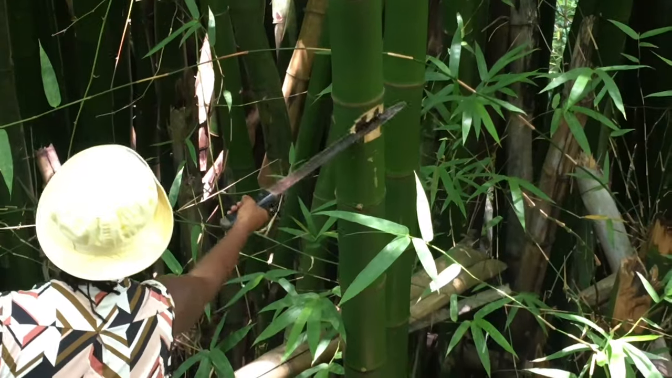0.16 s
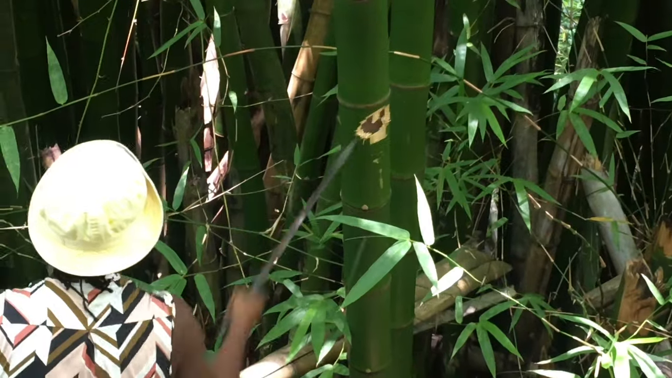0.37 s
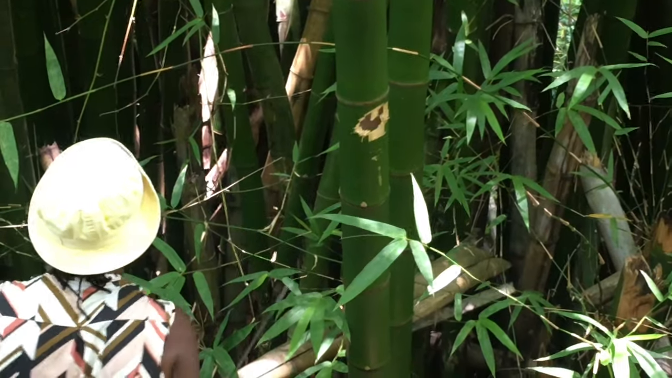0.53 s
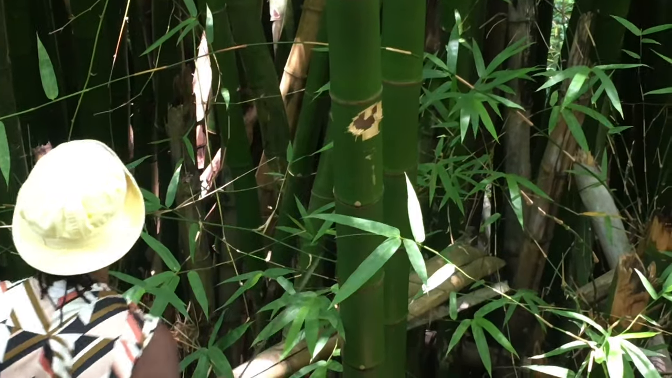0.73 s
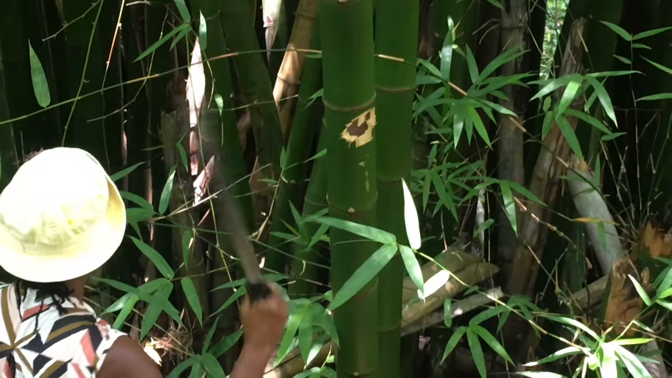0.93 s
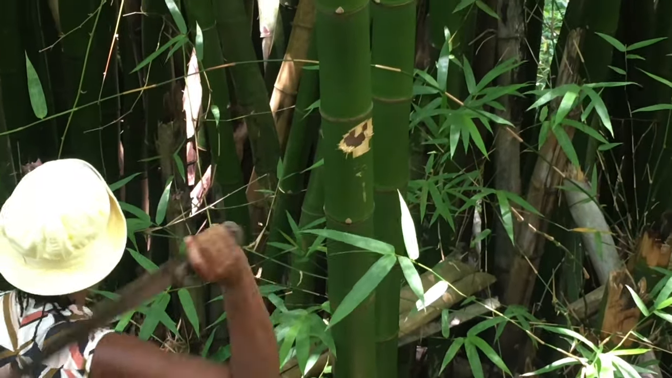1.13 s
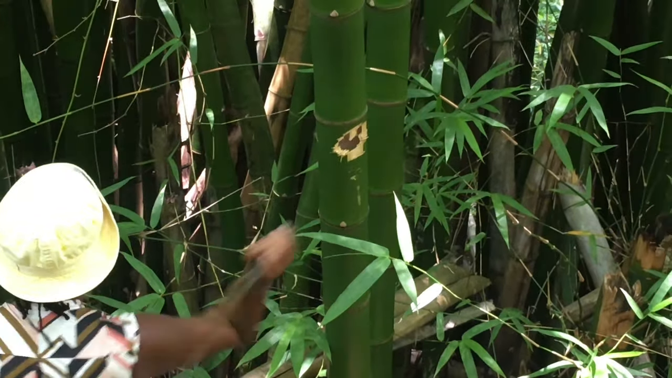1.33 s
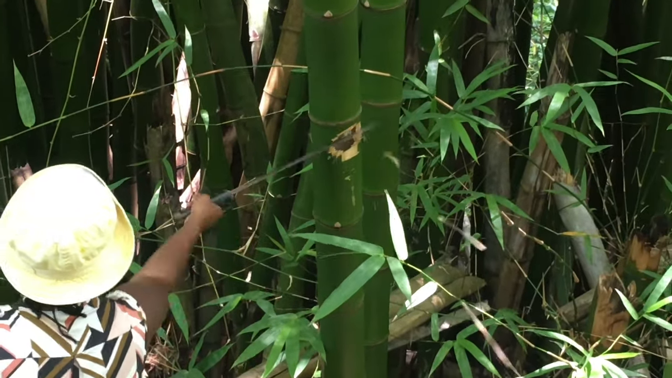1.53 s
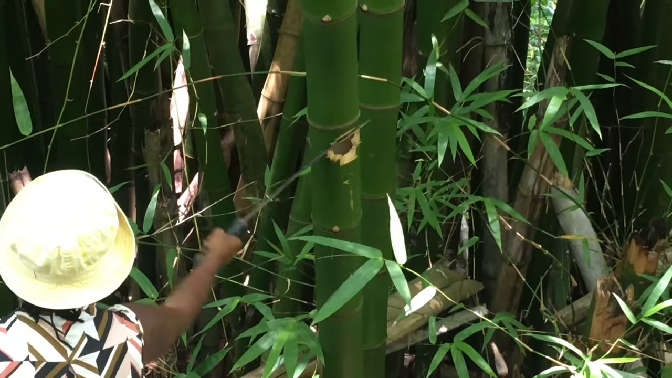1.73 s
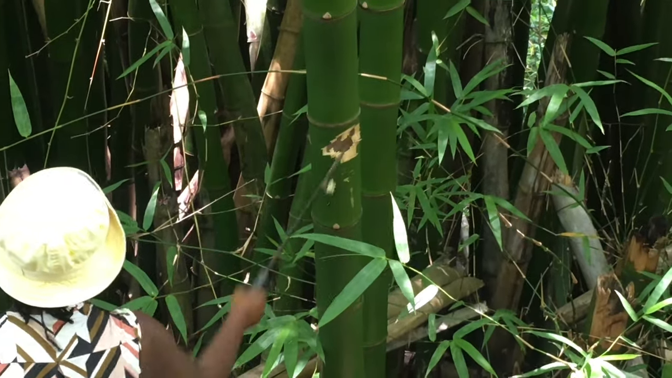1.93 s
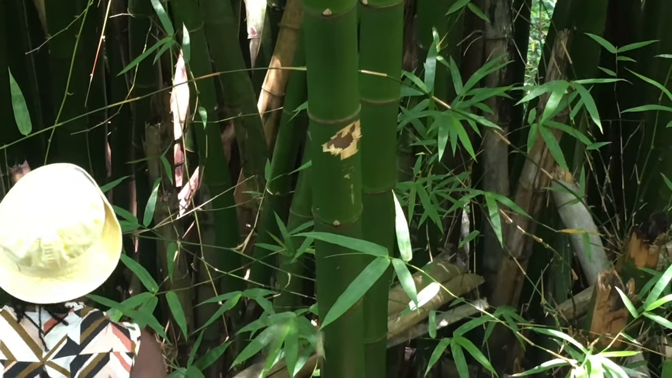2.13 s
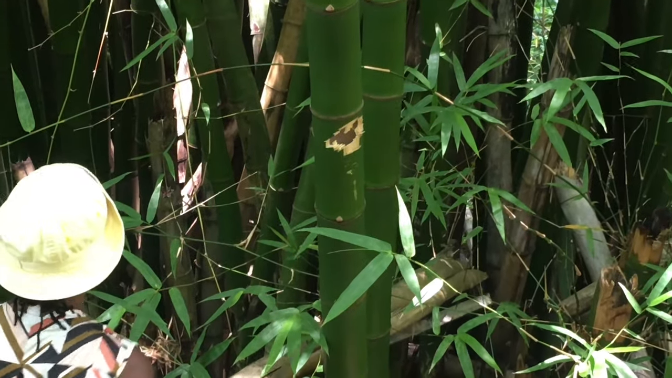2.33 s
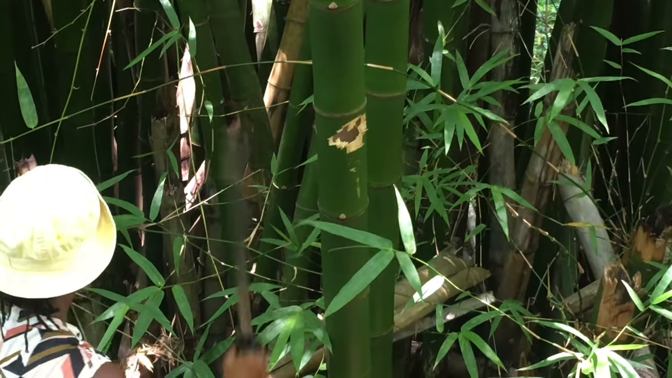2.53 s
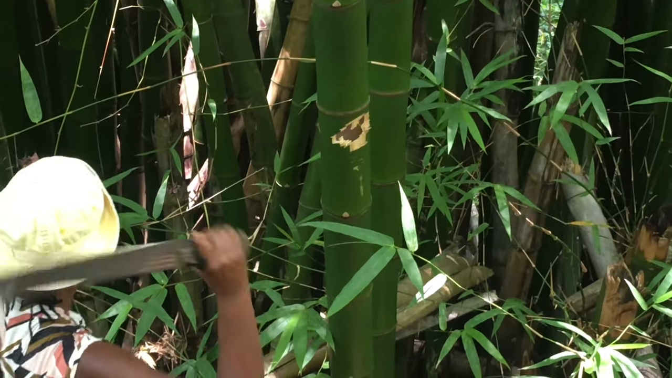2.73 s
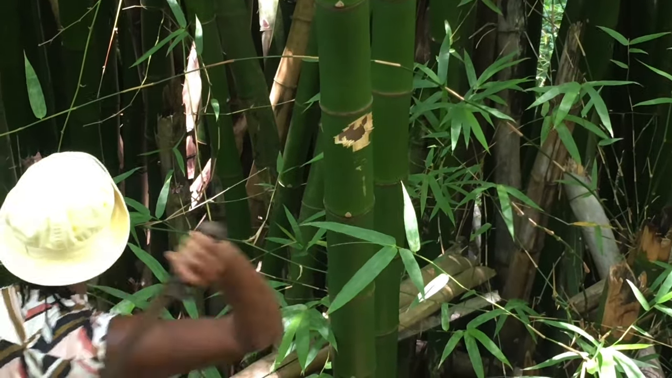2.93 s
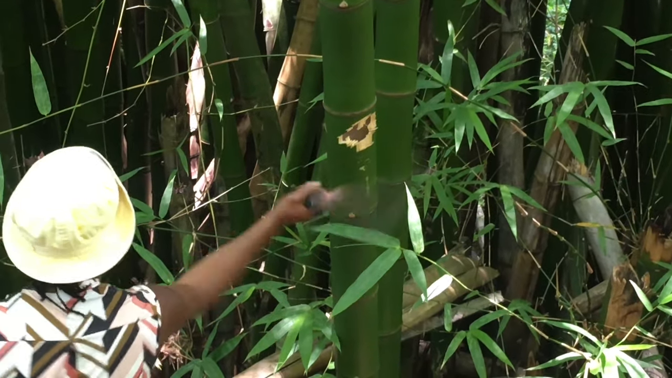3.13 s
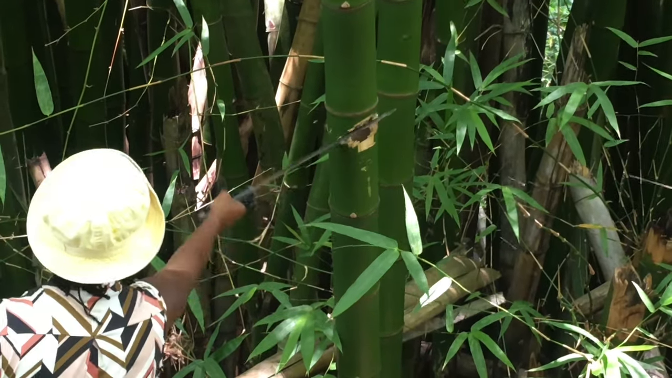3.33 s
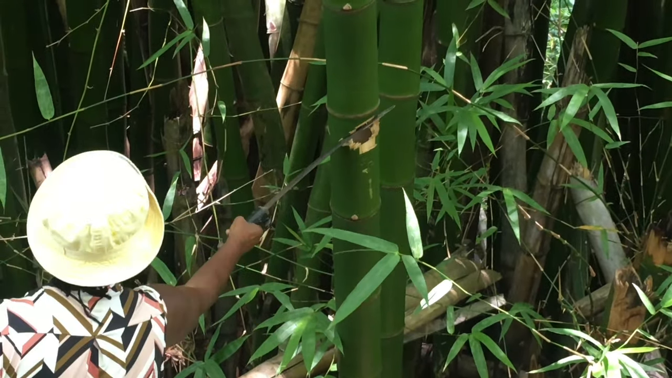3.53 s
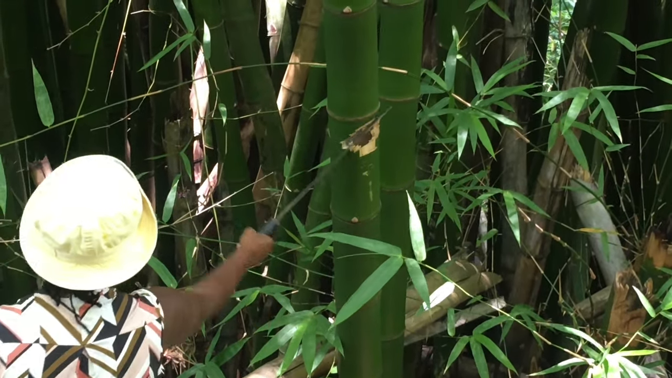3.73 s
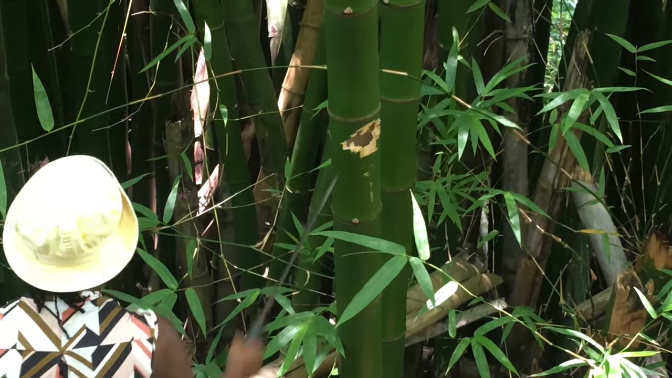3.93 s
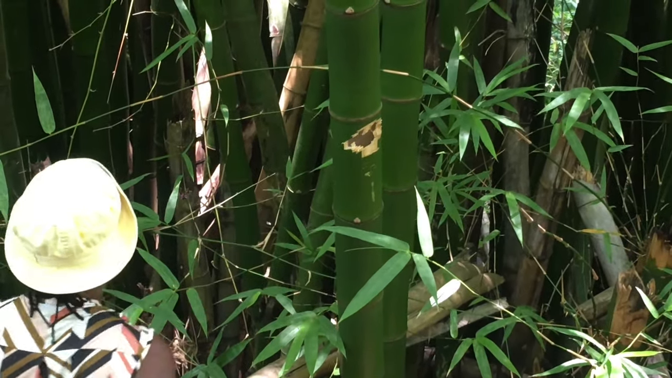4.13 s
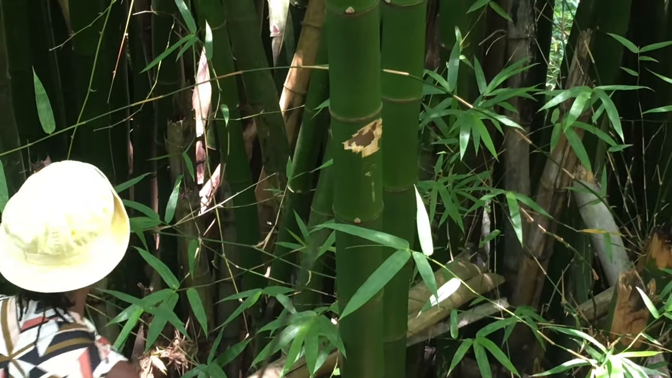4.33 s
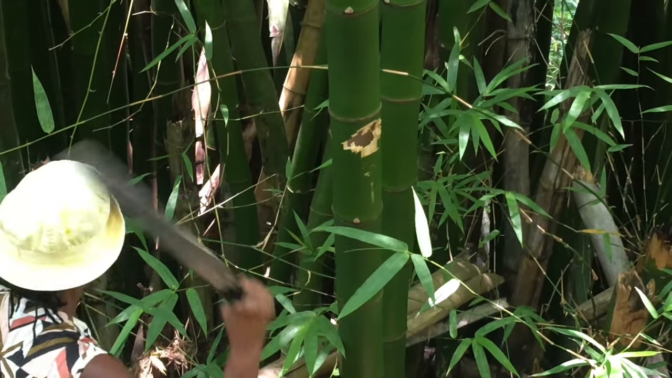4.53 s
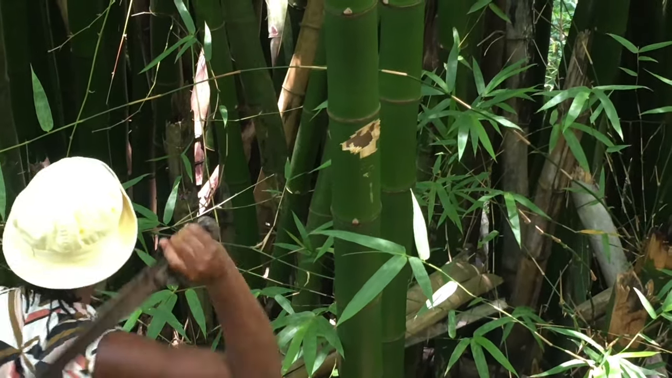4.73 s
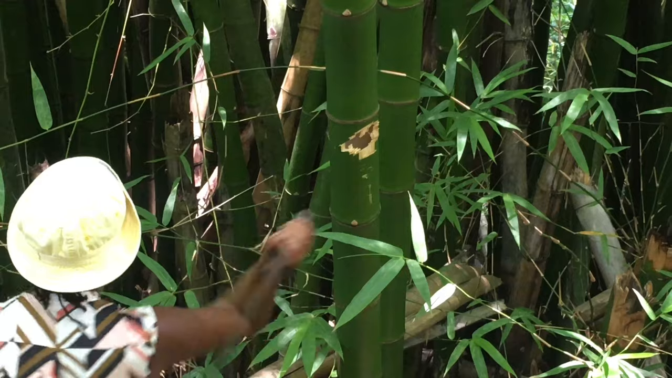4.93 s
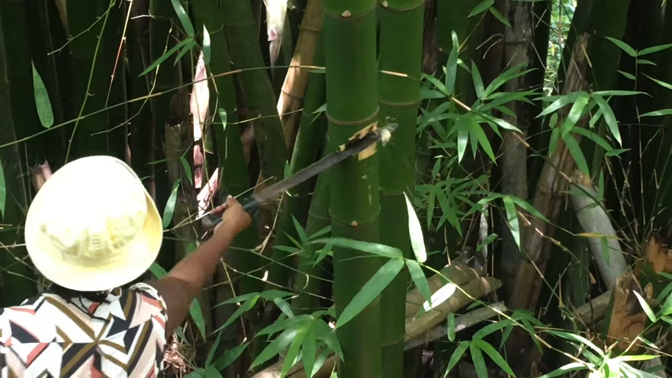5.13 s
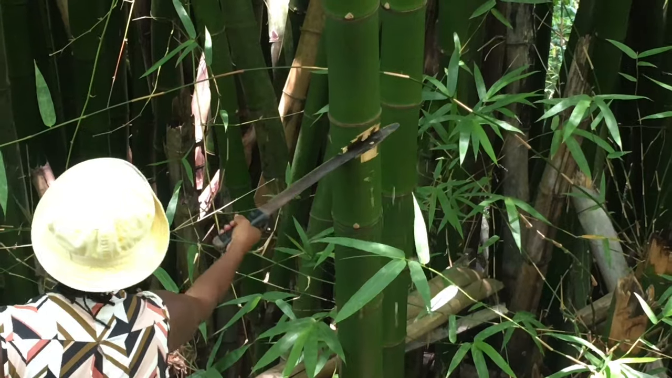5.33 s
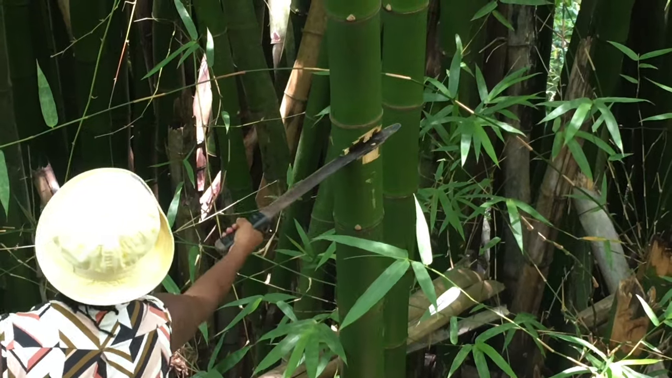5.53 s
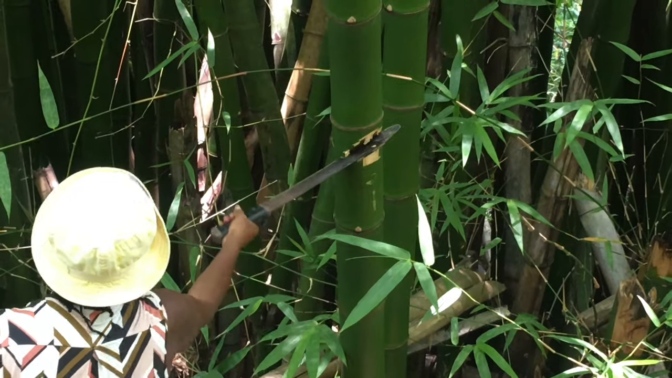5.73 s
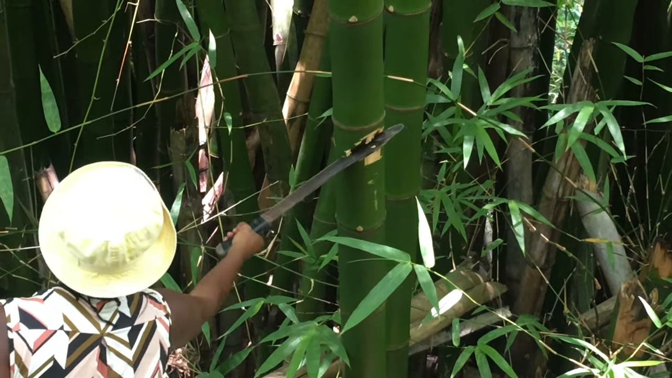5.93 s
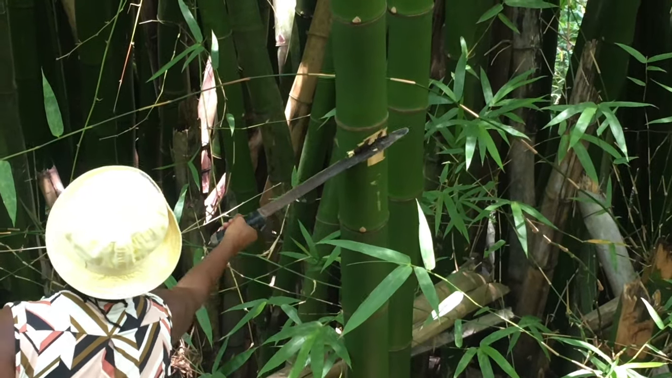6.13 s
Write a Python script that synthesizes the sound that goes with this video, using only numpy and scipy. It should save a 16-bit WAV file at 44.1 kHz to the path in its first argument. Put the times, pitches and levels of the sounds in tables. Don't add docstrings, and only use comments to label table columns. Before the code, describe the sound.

A hushed outdoor bamboo grove, heard through a small close microphone. From 0 to 1 s there is soft airy hiss, a faint high cicada band swelling, light twig and leaf ticks, and a blade scraping and bumping loose at 0.2-0.35 s. At about 1.47 s, after a short swish, a machete bites a hollow green stalk: a hard woody crack, brief midrange ring, low boom, and long scattered hiss. Bright scrapes and leaf snaps follow at 1.77-2 s as it frees; the cicadas stop near 1.9 s. A second, sharper splintering chop lands at 3.18 s, with small knocks and scraping around 3.65 s. Low wind rumble and thumping buffets now grow strong. Faint cricket ticks run from 4.2 to 5 s, with a high whistle at 4.35 s and weak low drones. The third heavy chop hits at 5.07 s, followed by fibre creaks, rasping and leaf snaps at 5.55-5.9 s.

```python
import sys
import numpy as np
from scipy import signal
from scipy.fft import rfft, irfft
from scipy.io import wavfile
from scipy.ndimage import uniform_filter1d

SR = 44100
rng = np.random.default_rng(int(sys.argv[2]) if len(sys.argv) > 2 else 0)


def store_wav(level_fs):
    pcm = np.round(np.clip(np.atleast_2d(level_fs), -1, 1) * 32767)
    wavfile.write(sys.argv[1], SR, pcm.T.astype(np.int16))


def elevation(decibels):
    levels = np.asarray(decibels, float)
    return 10 ** (levels / 20)


N = 272587
CLOCK = np.arange(N) / SR


def evened(x):
    return x / np.sqrt(np.mean(x ** 2) + 1e-20)


def read(points, hz):
    f, value = np.transpose(points)
    return np.interp(np.log(hz + 1), np.log(f + 1), value)


def add(mix, s, sound):
    part = mix[round(s * SR):][:len(sound)]
    part += sound[:len(part)]


def noise(points, count):
    hz = np.fft.rfftfreq(count, 1 / SR)
    return evened(irfft(rfft(rng.standard_normal(count)) * elevation(read(points, hz)), count))


def smoothed_twice(x, size, axis=-1):
    return uniform_filter1d(uniform_filter1d(x, size, axis=axis), size, axis=axis)


def wobble(width_s, count):
    return evened(smoothed_twice(rng.standard_normal(count), max(int(width_s * SR), 2)))


def resonate(x, hz, width):
    turn = np.exp(2j * np.pi * np.cumsum(hz * np.ones(len(x))) / SR)
    r = np.exp(-np.pi * width / SR)
    smooth = signal.lfilter([(1 - r) ** 2], [1, -2 * r, r * r], x / turn)
    return 2 * (turn * smooth).real


# pitch in Hz, level in dB per Hz.
AIR = [(42, -3.5), (105, -17.5), (198, -12.5), (356, -15), (425, -10.5), (469, -18), (752, -13.5),
       (1900, -20.5), (2550, -21.5), (4870, -24.5), (5930, -24), (10500, -27.5), (13300, -28.5),
       (15600, -29), (16500, -53)]


def hush():
    level_db = -63.5 + 0.21 * wobble(0.076, N) + 1.1 * wobble(0.0039, N)
    return elevation(level_db) * noise(AIR, N)


# pitch in Hz, level in dB per Hz.
CICADA_BAND = [(4000, -25), (5200, -7.5), (6000, -8), (7000, -7.5), (7600, -8), (8800, -24.5)]


def cicadas():
    start_s, end_s, swell_s, stop_s = 0.049, 1.9, 0.49, 0.026
    swell = np.minimum((CLOCK - start_s) / swell_s, (end_s - CLOCK) / stop_s)
    return elevation(-66) * np.clip(swell, 0, 1) ** 0.83 * noise(CICADA_BAND, N)


# start in seconds, length in seconds, pitch in Hz, level in dB, fuzz width in Hz.
SINGERS = [
    (3.85, .12, 8750, -71, 300),
    (4.345, .23, 8950, -60, 600),
    (4.355, .27, 8580, -61, 40),
    (3.86, .24, 1745, -71, 80),
    (4.12, .27, 1735, -73, 100),
    (4.39, .16, 1700, -77, 110),
    (4.55, .51, 1675, -73, 100),
    (2.52, .14, 1330, -74, 90),
    (2.87, .13, 1325, -72, 90),
]


def singers():
    out = np.zeros(N)
    for start, length, hz, db, width in SINGERS:
        t = np.arange(0, length, 1 / SR)
        fade_db, sag = (-15, 0) if hz > 4000 else (0.5, 0.015)
        pitch = hz * (1 - sag * t / length)
        tone = resonate(rng.standard_normal(len(t)), pitch, width)
        tone = tone / (0.64 + abs(signal.hilbert(evened(tone))))
        shape = np.minimum(t / 0.012, 1) * signal.windows.tukey(len(t), 0.25)
        add(out, start, elevation(db + fade_db * t / length) * evened(tone) * shape)
    return out


def tick(db, hz, t60, spread, count):
    t = np.arange(8192) / SR
    tones = np.zeros(len(t))
    for _ in range(count):
        tones += np.sin(2 * np.pi * (hz * rng.normal(1, spread) * t + rng.random()))
    rise_s = max(0.00075, 1.1 / hz)
    return elevation(db - 4.0 - 60 * t / t60) * tones * np.minimum(t / rise_s, 1)


# time in seconds, peak level in dB.
CRICKET = [
    (4.1724, -59.5),
    (4.251, -60),
    (4.3305, -58.5),
    (4.4076, -59.5),
    (4.4905, -54.5),
    (4.6029, -59),
    (4.721, -58),
    (4.858, -59.5),
    (4.9906, -60),
]
# pitch in Hz, level in dB.
CRICKET_TONES = [(1650, -2.5), (2580, -1.5), (3650, -8.5)]


def cricket():
    out = np.zeros(N)
    for s, db in CRICKET:
        for hz, tone_db in CRICKET_TONES:
            add(out, s, tick(db + tone_db, hz, t60=0.055, spread=0.03, count=3))
    return out


# time in seconds, level in dB.
BREEZE = [(0.0, -80), (0.95, -74), (1.1, -56.5), (1.34, -51), (2.13, -51.5), (2.48, -73), (3.08, -53.5),
          (3.37, -46), (3.72, -46), (4.41, -38), (5.8, -39.5), (6.02, -65.5), (6.18, -58)]
# middle in seconds, length in seconds, level in dB, edge in dB against the rumble.
GUSTS = [(0.056, .08, -67, -27), (0.514, 0.054, -59, -45), (1, 0.044, -60, -32), (1.275, 0.087, -40, -14.5),
         (1.323, 0.035, -25, -12.5), (1.383, 0.033, -32, -23), (1.55, 0.06, -42.5, -29),
         (1.8, 0.043, -46.5, -13), (1.912, 0.069, -30.5, -15.5), (2.062, 0.057, -34.5, -23),
         (2.205, 0.14, -41, -24.5), (2.44, 0.081, -42.5, -45), (2.562, 0.09, -42.5, -35.5),
         (2.746, 0.093, -38, -39), (2.954, 0.075, -35.5, -25.5), (3.16, 0.084, -37, -15),
         (3.242, 0.06, -30, -5), (3.415, 0.12, -36.5, -20), (3.591, 0.11, -35, -13),
         (4.092, 0.17, -35.5, -10), (4.278, 0.022, -35.5, -4.5), (4.479, 0.097, -29, -16.5),
         (4.596, 0.065, -31, -5.5), (4.681, 0.038, -33, -33), (4.798, 0.067, -39.5, -5),
         (4.895, 0.039, -27, -19), (5.045, 0.034, -33.5, -10), (5.257, 0.17, -34.5, -7),
         (5.48, 0.046, -40, -15.5), (5.925, 0.055, -35, -35), (6.072, 0.04, -38, -25)]
# pitch in Hz, level in dB per Hz.
RUMBLE = [(11, -46.5), (18, -22.5), (43, 7.5), (69, 7), (123, -6), (200, -19), (260, -44), (440, -120)]
# pitch in Hz, level in dB per Hz.
EDGE = [(80, -31.5), (130, -6.5), (180, -3), (250, -5.5), (350, -24), (500, -37.5), (800, -79.5)]


def wind():
    breeze_db = np.interp(CLOCK, *np.transpose(BREEZE))
    level = elevation(breeze_db + 6.5 * np.minimum(wobble(0.02, N), 0.8))
    edge_level = level ** 1.49 * elevation(-9)
    for middle, length, db, edge_db in GUSTS:
        swell = elevation(db) * np.exp(-(2 * (CLOCK - middle) / length) ** 2)
        level = level + swell
        edge_level = edge_level + swell * elevation(edge_db)
    rumble = noise(RUMBLE, N)
    rumble = evened(rumble / (1.0 + np.sqrt(uniform_filter1d(rumble ** 2, 1500))))
    edge = evened(elevation(6.1 * wobble(0.0064, N)) * noise(EDGE, N))
    return level * rumble + edge_level * edge


# time in seconds, peak level in dB, pitch in Hz.
EDDIES = [(1.3, -22, 94), (1.853, -28.5, 112), (1.914, -32, 130), (2.18, -30, 101), (3.155, -23.5, 111),
          (3.249, -16.5, 105.7), (3.461, -13, 120), (3.552, -19, 109), (3.565, -14.5, 107),
          (3.608, -27, 108), (3.624, -29, 140), (3.754, -37, 110), (3.826, -28, 116), (3.864, -29, 108.6),
          (3.927, -35.5, 109), (3.948, -28, 117), (4.02, -36, 127.6), (4.039, -32, 130.5),
          (4.082, -20.5, 131), (4.099, -24, 130), (4.147, -28.5, 151), (4.187, -30.5, 130),
          (4.213, -28.5, 109), (4.252, -19.5, 120), (4.327, -25, 133.7), (4.347, -23.5, 124.5),
          (4.408, -39, 110.1), (4.436, -29, 110), (4.449, -17.5, 101), (4.465, -15.5, 90.2),
          (4.581, -17.5, 116), (4.605, -17.5, 127), (4.745, -37, 100), (4.763, -14.5, 94), (4.82, -26, 109),
          (4.848, -25, 110), (4.884, -22, 101), (4.956, -25, 112), (5.014, -38, 111), (5.029, -28, 111),
          (5.208, -25, 109), (5.246, -24, 119), (5.304, -21.5, 89.5), (5.359, -23.5, 119),
          (5.458, -30, 100), (5.515, -41, 110), (5.553, -46, 102), (5.623, -38, 108), (5.647, -29.5, 119),
          (5.711, -23.5, 111.4), (5.765, -39, 108.4), (5.827, -30, 97.7), (5.887, -22, 119),
          (5.91, -29, 134), (5.923, -29, 98)]


def eddies():
    out = np.zeros(N)
    for s, db, hz in EDDIES:
        turns = np.arange(4000) / SR * hz
        rise_turns = 0.45 + 0.0075 * max(-11.5 - db, 0)
        rise = np.sin(np.pi / 2 * np.minimum(turns / rise_turns, 1)) ** 2
        swing = np.sin(2 * np.pi * turns ** 0.86) * np.exp(-turns / 0.6)
        add(out, s, elevation(db + 6.5) * swing * rise)
    return out


def snap(db, hz, t60, spread):
    t = np.arange(1024) / SR
    band = [(hz / spread ** 2, -30), (hz / spread, -5), (hz, 0), (hz * spread, -5), (hz * spread ** 2, -30)]
    puff = noise(band, len(t)) * elevation(-60 * t / t60) * np.minimum(t / 0.00064, 1)
    return elevation(db) * puff / abs(puff).max()


# time in seconds, peak level in dB, pitch in Hz.
TWIGS = [(0.138, -50, 3130), (0.291, -47, 1170), (0.323, -50, 7000), (0.3462, -40, 1140),
         (0.3477, -43.5, 2220), (0.347, -49, 3200), (0.5344, -49, 2310), (0.5876, -49, 5670),
         (0.601, -52, 3000), (0.7175, -41, 3360), (0.718, -41.5, 2600), (0.7189, -43, 2010),
         (0.72, -45.5, 1040), (0.7793, -51, 5600), (1.118, -51, 3270), (2.4, -59, 630),
         (2.302, -51.5, 3200), (2.45, -57, 1510), (3.01, -52.5, 3340), (3.6318, -53, 3260),
         (4.1137, -51, 3350), (4.343, -55, 6200), (4.349, -59, 7700), (3.3, -55, 3300), (4.9, -51.5, 3600),
         (4.913, -54, 3200), (8.7, -51, 960), (5.611, -54, 950), (5.691, -45.5, 2315), (5.773, -53.5, 3180),
         (5.8237, -51, 3040), (5.8768, -46, 3430), (5.887, -51, 1290), (5.897, -47, 1300)]


def twigs():
    out = np.zeros(N)
    for s, db, hz in TWIGS:
        add(out, s, snap(db, hz, t60=0.021, spread=1.136))
    return out


# time in seconds, peak level in dB, pitch in Hz.
LEAVES = [(0.2895, -48, 14500), (0.341, -42, 12500), (0.365, -50, 9000), (0.3988, -49, 13400),
          (0.522, -55, 13500), (0.534, -57, 13000), (0.5684, -58, 14500), (0.6254, -61, 14500),
          (0.7021, -51, 12500), (0.719, -47, 7160), (0.7435, -50, 12500), (0.7794, -59, 9100),
          (0.8178, -54, 9140), (0.9231, -48, 10500), (1.7659, -34, 13000), (1.794, -40, 11500),
          (1.799, -36.5, 11000), (1.805, -46.5, 12000), (1.864, -42, 12800), (1.9394, -50, 5500),
          (1.974, -49, 8050), (4.0874, -56, 9890), (4.9457, -58.5, 12300), (5.0045, -55, 13500),
          (5.0075, -47, 12300), (5.011, -53.5, 12100), (5.689, -56.5, 11040), (5.708, -53.5, 13260),
          (5.866, -51, 10500), (5.877, -42, 11900), (5.886, -46, 12000), (5.895, -44.5, 12000),
          (5.903, -53, 12020)]


def leaves():
    out = np.zeros(N)
    for s, db, hz in LEAVES:
        add(out, s, snap(db, hz, t60=0.0098, spread=1.3))
    return out


# time in seconds, peak level in dB, pitch in Hz, 60 dB decay in seconds.
KNOCKS = [(0.205, -40, 650, 0.094), (0.207, -39, 983, 0.064), (0.208, -45.5, 315, 0.19),
          (0.231, -38.5, 329, 0.048), (0.328, -42.5, 250, 0.2), (0.3475, -30, 534, 0.022),
          (1.974, -28.5, 440, 0.01), (3.65, -51, 4150, 0.075), (3.662, -50, 1400, 0.043),
          (3.674, -35.5, 689, 0.098), (3.675, -41.5, 270, 0.15), (3.728, -62, 1510, .08),
          (3.73, -59, 4150, 0.084), (3.758, -55, 4050, .05), (5.066, -18.5, 350, 0.05),
          (5.079, -22.5, 249, 0.11), (5.108, -30.5, 400, 0.067)]


def knocks():
    out = np.zeros(N)
    for s, db, hz, t60 in KNOCKS:
        add(out, s, tick(db, hz, t60, spread=0.004, count=1))
    return out


# pitch in Hz, width in Hz, level in dB.
RUB = [(738, 75, 0), (1060, 600, -5), (1287, 96, -4), (1580, 170, -8), (2180, 130, -10.5), (2618, 220, -17),
       (3340, 180, -17)]
# pitch in Hz, level in dB per Hz.
RASP = [(1470, -27), (2500, -2), (3370, -3.5), (4740, -3.5), (6100, -4.5), (8300, -8.5), (11300, -9.5),
        (15500, -13), (16500, -26.5)]


def scrape(count, rasp_db):
    grip = elevation(6.0 * wobble(0.0011, count)) * rng.standard_normal(count)
    rub = evened(sum(elevation(db) * resonate(grip, hz, width) for hz, width, db in RUB))
    rasp = evened(elevation(3.7 * wobble(0.0038, count)) * noise(RASP, count))
    return rub + rasp * elevation(rasp_db)


# start in seconds, fibre rub in dB, steel rasp in dB against the rub,
# 60 dB decay in seconds.
SLIPS = [(0.202, -48, -15, 0.093), (0.209, -49, -9, 0.23), (0.288, -59, 0.5, 0.66), (0.335, -53, -6, 0.17),
         (1.766, -43.5, -4, 0.39), (1.778, -48.5, -0.5, 0.071), (1.795, -44.5, -6, 0.082),
         (1.8438, -43, -20, 0.15), (1.865, -48, 2, 0.11), (1.94, -51, -3.5, 0.12), (1.975, -56.5, -20, 0.1),
         (2.438, -69.5, 2, 0.36), (3.632, -61, -2.5, 0.19), (3.652, -54.5, -1, 0.26),
         (3.672, -55.5, -25, 0.77), (3.78, -65, 8, 0.103), (5.553, -56.5, -18.5, 0.18),
         (5.605, -56.5, -12, 0.24), (5.655, -55.5, -18.5, 0.12), (5.688, -58, 2, 0.3),
         (5.822, -56, -13, 0.17), (5.866, -53, -2.5, 0.21), (5.878, -52, -2, 0.19)]


def wrench():
    out = np.zeros(N)
    t = np.arange(8192) / SR
    for s, rub_db, rasp_db, t60 in SLIPS:
        shape = np.minimum(t / 0.002, 1) * np.cos(np.pi / 2 * t / t[-1])
        add(out, s, scrape(len(t), rasp_db) * elevation(rub_db - 60 * t / t60) * shape)
    return out


def swish(bite_s):
    length_s = 0.065
    ramp = np.linspace(-1, 0, round(length_s * SR))
    return bite_s - length_s, scrape(len(ramp), rasp_db=-26) * elevation(-58.5 + 28 * ramp)


def crack(splinter):
    click = irfft(elevation(read(splinter, np.fft.rfftfreq(512, 1 / SR))))
    click = np.roll(click, 256) * np.hanning(512)
    return click / np.linalg.norm(click)


def ring(modes, t):
    out = np.zeros(len(t))
    for hz, db, t60 in modes:
        decay_s = min(t60, 5.8 / np.sqrt(hz))
        rise = np.minimum(t / 0.012 * (hz / 250) ** 3, 1)
        level = elevation(db - 60 * t / decay_s + 5.0 * wobble(0.002, len(t)))
        out += level * rise * np.sin(2 * np.pi * hz * rng.normal(1, 0.012) * t)
    return out


def chop(jolts, modes, splinter):
    t = np.arange(SR // 2) / SR
    start = jolts[0][0]
    out = np.zeros(len(t))
    for s, jolt_db, splinter_db in jolts:
        bite = ring(modes, t) * np.minimum(t / 0.0021, 1)
        burst = noise(splinter, len(t)) * np.minimum(t / 0.00065, 1)
        burst = burst * (elevation(-60 * t / 0.017) + elevation(-8.5 - 60 * t / 0.15))
        add(out, s - start, elevation(jolt_db) * bite + elevation(splinter_db) * burst)
    return start, out


# time in seconds, jolt in dB, splintering in dB.
CHOPS = [
    [(1.4648, -19, -16.5), (1.4668, -23, -16.5), (1.4685, -19, -16), (1.4715, -17.5, -25.5)],
    [(3.1804, -34, -22.5), (3.182, -29.5, -10.5), (3.1838, -15, -17), (3.1915, -21.5, -22.5)],
    [(5.0667, -19.5, -13), (5.0686, -17.5, -18.5), (5.0716, -18.5, -25), (5.0765, -29, -26.5)],
]
# pitch in Hz, level in dB, 60 dB decay in seconds.
STALK = [
    [(257.4, -6.5, 0.2), (762, -6.5, 0.079), (888, -16, 0.21), (1170, -11.5, 0.093), (1156, -5, 0.12),
     (1560, -16.5, 0.14), (1726, -7.5, 0.081), (2310, -18.5, 0.089), (2780, -14, 0.34), (3270, -19, 0.13),
     (3970, -30, 0.081), (400, -15, 0.21), (5740, -35, 0.39), (6487, -9.5, 0.046)],
    [(255, -12, 0.274), (401, -16, 0.1), (624, -25.5, 0.1), (685.6, -4.5, 0.11), (1112, -12, 0.09),
     (762, -3.5, 0.086), (1007, 0, 0.051), (1250, -9.5, 0.066), (1694, -10, 0.06), (2200, -24.5, 0.15),
     (1480, -19.5, 0.1), (3820, -17.5, 0.096), (5630, -20, 0.076), (6810, -48, 0.14)],
    [(271.6, -8.5, 0.22), (350, -7, 0.083), (708, -4, 0.12), (767, -3.5, 0.12), (1013, 3.5, 0.032),
     (1240, -10.5, 0.07), (1442, -14, 0.071), (1706, -8, 0.054), (2326, -14.5, 0.11), (2244, -11.5, 0.15),
     (3540, -18.5, 0.091), (1280, -15.5, 0.07), (567, -22, 0.072), (6530, -16.5, 0.18)],
]
# pitch in Hz, level in dB per Hz.
SPLINTER = [
    [(180, -32.5), (550, -14.5), (1190, -7), (1430, -15.5), (1720, -14), (2000, -22.5), (2280, -20),
     (12400, -26), (16500, -28)],
    [(180, -42.5), (300, -9.5), (1190, -2), (1690, -13), (2000, -17), (4930, -21), (13000, -21.5),
     (15300, -13.5), (16500, -35)],
    [(180, -32), (560, -11.5), (1030, 0), (1690, -11), (2000, -15.5), (2280, -16), (5020, -21),
     (14900, -21), (16500, -36)],
]


def chops():
    blade, cracks, swishes = np.zeros((3, N))
    for jolts, modes, splinter, crack_db in zip(CHOPS, STALK, SPLINTER, [1.5, 3, 1]):
        add(blade, *chop(jolts, modes, splinter))
        add(cracks, jolts[2][0] - 256 / SR, elevation(crack_db) * crack(splinter))
        add(swishes, *swish(jolts[0][0]))
    return blade, cracks, swishes


def far_clump(blade):
    out = np.zeros(N)
    add(out, 0.101, elevation(-16.5) * resonate(blade, 853, 140))
    return out


# pitch in Hz, 60 dB decay in seconds.
GROVE = [(250, 1), (700, 0.93), (1500, 0.81), (4000, 0.83), (8000, 0.87), (15000, 0.48)]
# pitch in Hz, level in dB.
GROVE_COLOUR = [(200, -3), (400, -1.5), (550, -10.5), (850, -3.5), (1300, -5.5), (2000, 3), (4000, 4),
                (15000, 4.5)]


def grove(x):
    taps = np.zeros(SR)
    at = np.arange(400, SR - 20, 20)
    taps[at + rng.integers(0, 20, len(at))] = rng.choice([-1., 1.], len(at))
    hz, t, z = signal.stft(taps, SR, nperseg=256)
    hz = hz[:, None]
    clumps = uniform_filter1d(uniform_filter1d(rng.standard_normal(z.shape), size=4, axis=0), size=5, axis=1)
    patchy_db = 3.5 * evened(clumps) / (1 + hz / 4000)
    level_db = patchy_db + read(GROVE_COLOUR, hz) - 60 * t / read(GROVE, hz)
    tail = signal.istft(z * elevation(level_db), SR, nperseg=256)[1]
    return signal.fftconvolve(x, tail / np.linalg.norm(tail))[:N]


def scene():
    background = hush() + cicadas() + wind() + eddies()
    blade, cracks, swishes = chops()
    small = swishes + wrench() + knocks() + leaves()
    far = twigs() + cricket() + singers() + far_clump(blade)
    scatter = grove(cracks + elevation(-19) * blade + elevation(-7.5) * small)
    return (blade + elevation(-10.5) * cracks + small + scatter + far + background)[None]


def low_pass(x):
    return signal.sosfilt(signal.butter(12, 15750, fs=SR, output="sos"), x)


# pitch in Hz, width in Hz, level in dB.
DIPS = [(517, 70, -2), (4910, 720, -5.5), (7630, 1100, -3.5), (10300, 520, -3)]


def record(dry):
    hz = np.fft.rfftfreq(N, 1 / SR)
    dips_db = sum(db * np.exp(-((hz - f) / width) ** 2) for f, width, db in DIPS)
    low_cut = (47.7 / (hz + 1)) ** 8
    top_stop = (hz / 16050) ** 200
    gain = elevation(dips_db) / np.sqrt(1 + low_cut + top_stop)
    return low_pass(irfft(rfft(dry) * gain, N))


dry = scene()
out = record(dry)
store_wav(out)
```